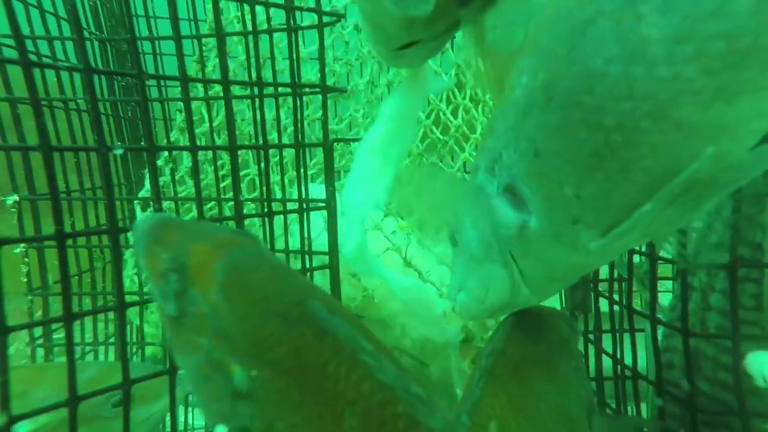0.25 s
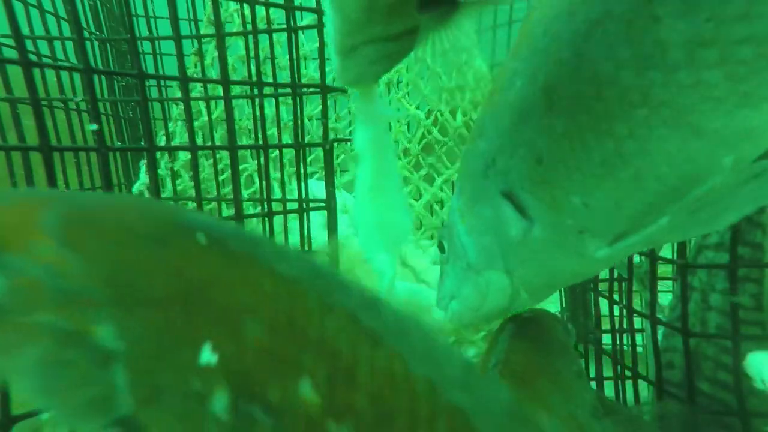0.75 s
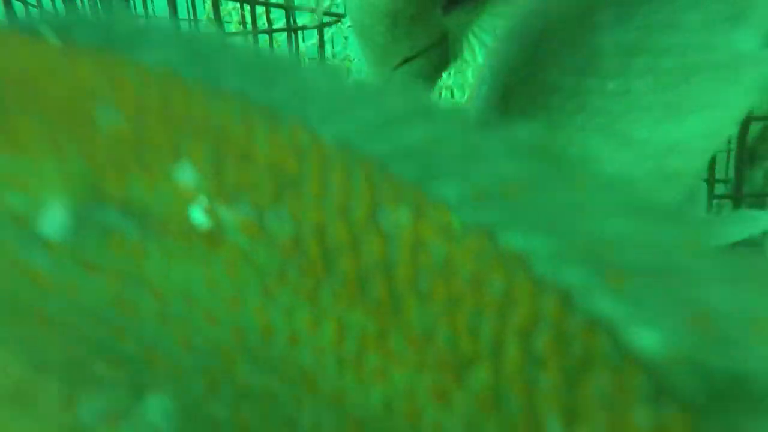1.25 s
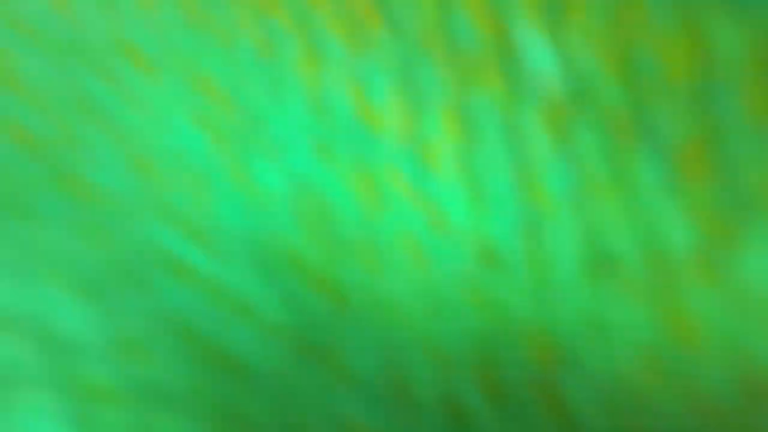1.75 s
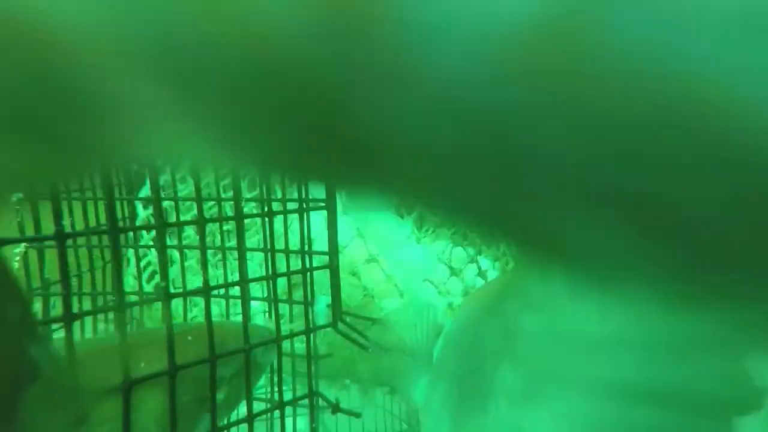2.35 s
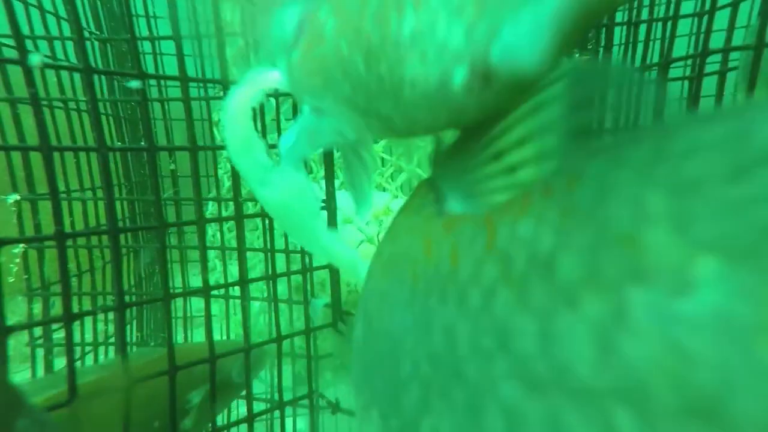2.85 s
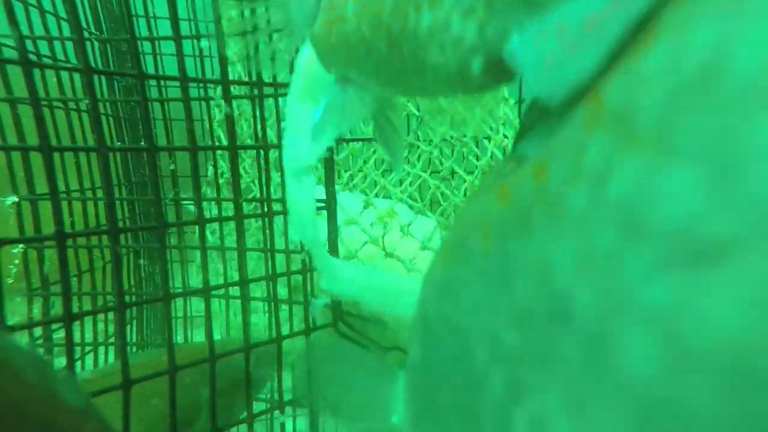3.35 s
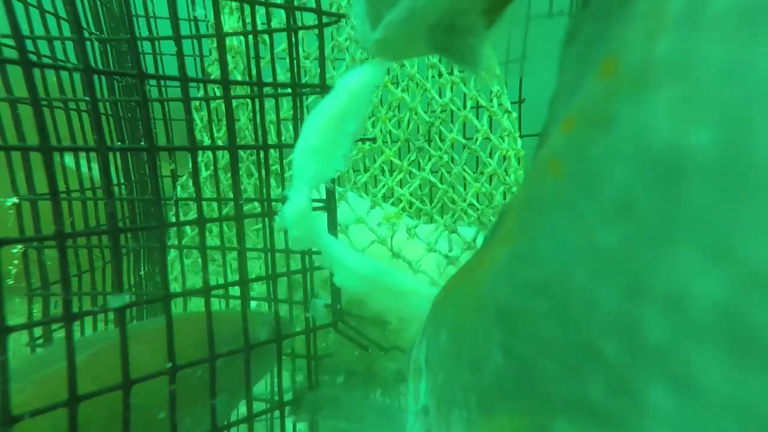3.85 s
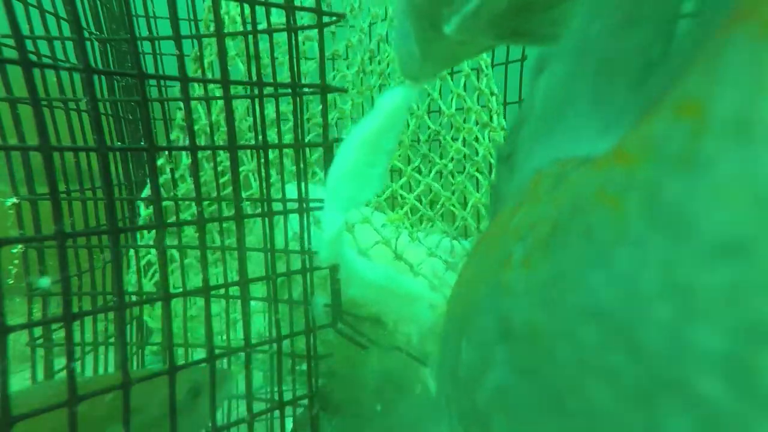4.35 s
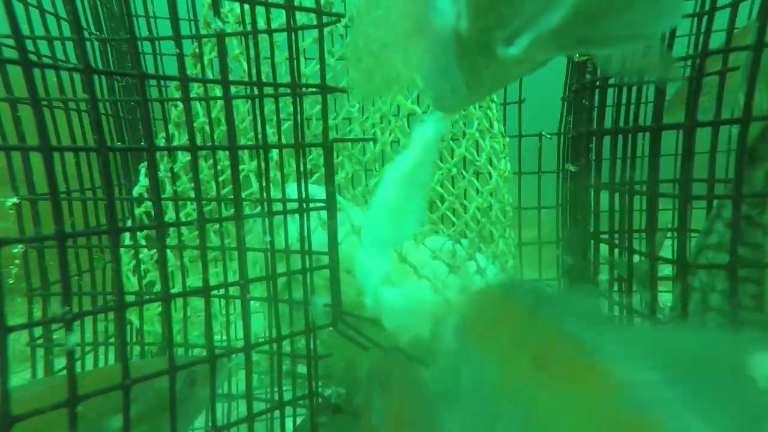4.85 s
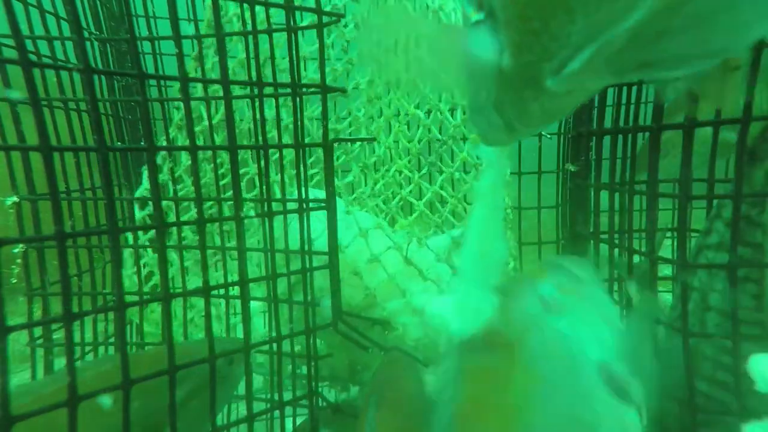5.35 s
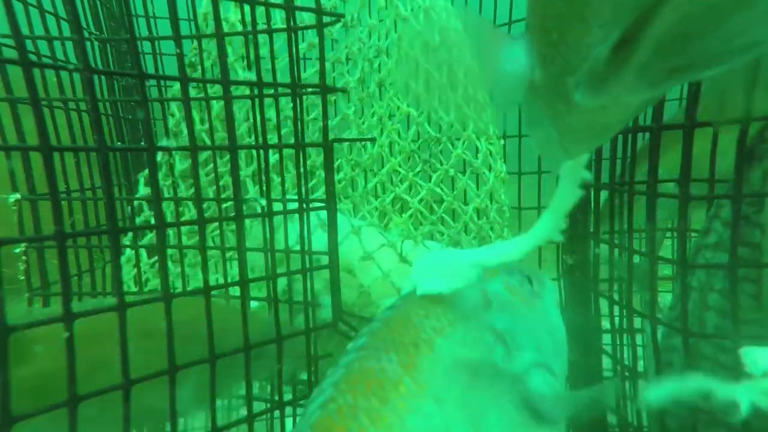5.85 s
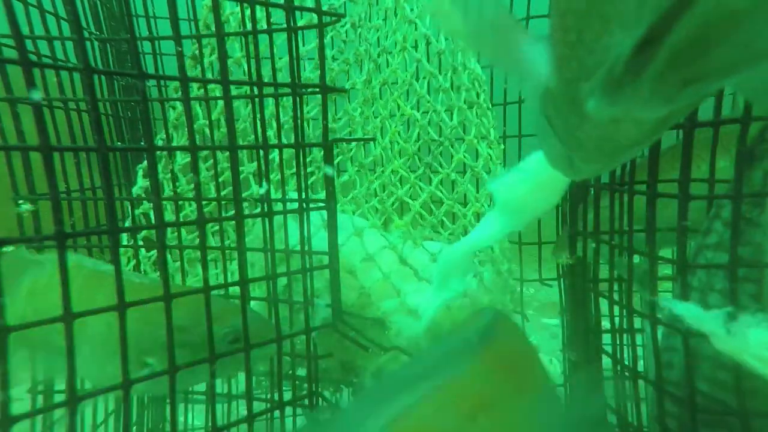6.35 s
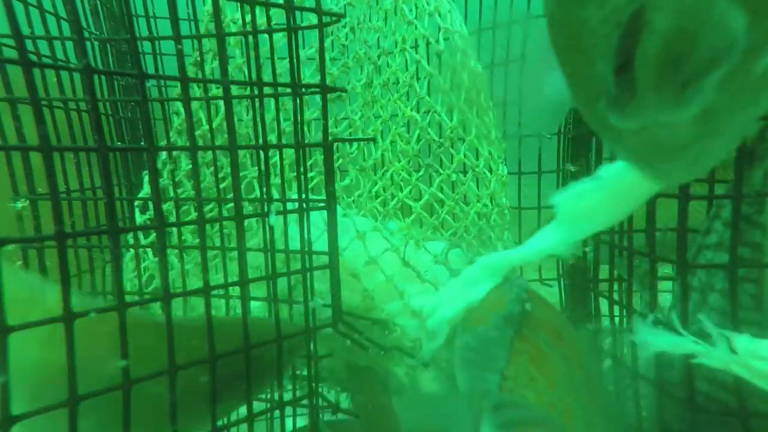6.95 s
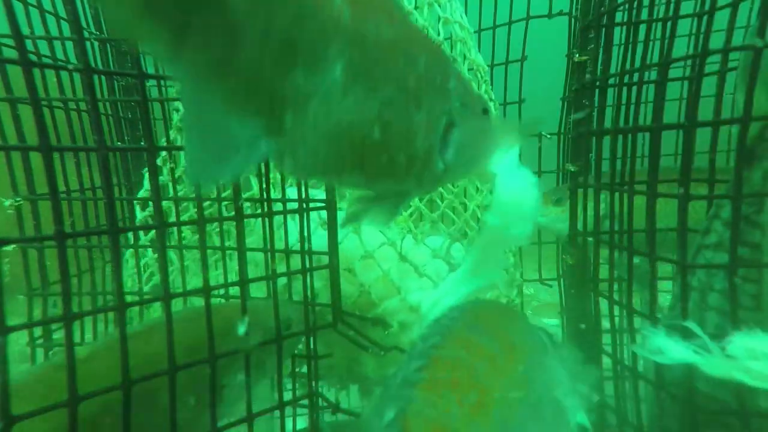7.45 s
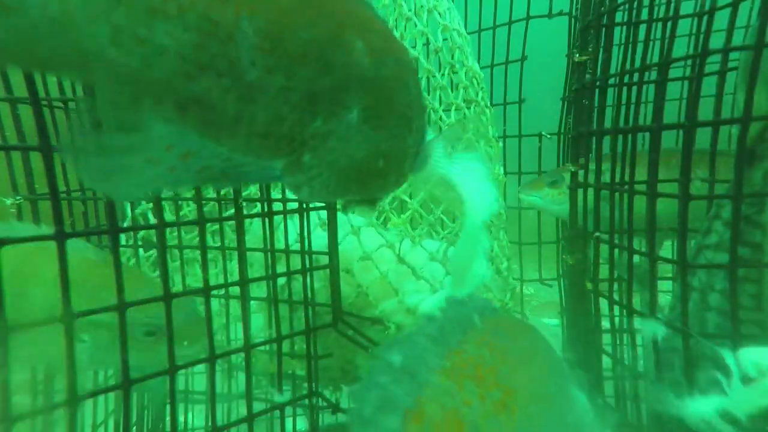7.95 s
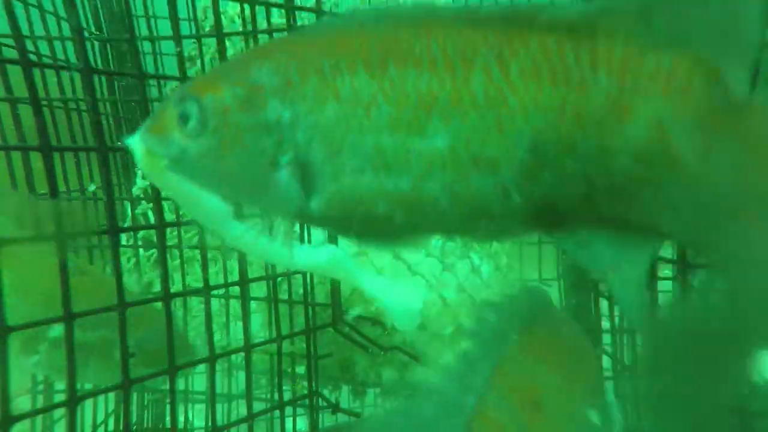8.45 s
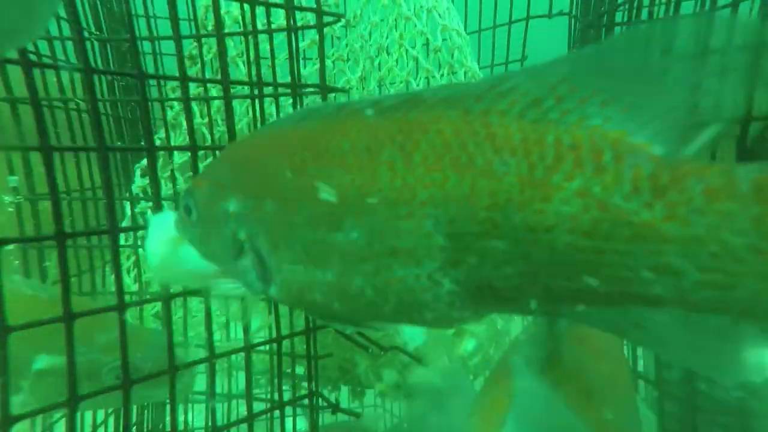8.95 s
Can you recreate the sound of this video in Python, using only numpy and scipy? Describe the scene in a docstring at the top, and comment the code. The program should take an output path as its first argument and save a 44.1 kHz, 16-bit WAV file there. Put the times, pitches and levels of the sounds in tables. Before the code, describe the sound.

Dull underwater thumps and hollow plastic knocks as fish bump a camera case inside a wire trap, over a steady low hiss.

```python
"""Fish bumping a bait trap

Fish tug at bait in a wire trap and bump a camera in a waterproof housing, heard from within it.
Soft blows excite low trap modes; scales and wire catch and slip on the hollow case, ringing its modes.
Plops and squeaks are swelling, wavering sines. Shaped noise gives the camera's hiss, a pulsed sine its whine.
"""
import sys
import numpy as np
from scipy import signal
from scipy.fft import rfft, irfft
from scipy.io import wavfile
from scipy.ndimage import uniform_filter1d

SR = 44100
rng = np.random.default_rng(int(sys.argv[2]) if len(sys.argv) > 2 else 0)


def master(y):
    """Save y as 16-bit WAV."""
    cut = np.clip(np.atleast_2d(y).T, -1, 1)
    pcm = np.round(cut * 32767)  # scale
    wavfile.write(sys.argv[1], SR, pcm.astype(np.int16))


N = 406587


def undb(db):
    """Decibels to amplitude gain."""
    return 10 ** (np.asarray(db) / 20)


def unit(x):
    """Scale to rms 1."""
    return x / np.sqrt(np.mean(x ** 2))


def add(out, x, start_s):
    """Mix x into out from start_s, cut at the end of out."""
    i = max(int(start_s * SR), 0)
    out[i:i + len(x)] += x[:max(N - i, 0)]


def noise(points, size, peaks=()):
    """Noise of rms 1 with a smooth spectrum, lifted at resonances."""
    freq_hz = np.maximum(np.fft.rfftfreq(size, 1 / SR), 1)
    point_hz, point_db = np.transpose(points)
    gain = undb(np.interp(np.log(freq_hz), np.log(point_hz), point_db))
    gain = gain * np.minimum(freq_hz / point_hz[0], 1) ** 2  # roll-off below the first point
    for centre_hz, width_hz, lift_db in peaks:
        offset = 2 * (freq_hz - centre_hz) / width_hz
        gain = gain * np.sqrt(1 + (undb(lift_db) ** 2 - 1) / (1 + offset ** 2))
    white = rng.standard_normal(size)
    return unit(irfft(gain * rfft(white), size))


def ring(modes, t, scatter_db, detune, signs=1):
    """Decaying modes; each place of contact weights and detunes them a little differently."""
    pitch_hz, t60_s, level_db = np.transpose(modes)
    chance = rng.standard_normal((len(pitch_hz), 2))
    gain = signs * undb(level_db + scatter_db * chance[:, 0])
    pitch_hz = pitch_hz * (1 + detune * chance[:, 1])
    decay = np.exp(-np.log(1000) * np.outer(1 / t60_s, t))
    return gain @ (np.sin(2 * np.pi * np.outer(pitch_hz, t)) * decay)


def voice(x, edges_hz, peaks_db, order, window):
    """Split a blow into bands and set each band's peak rms over a window of samples."""
    out = 0
    for low_hz, high_hz, peak_db in zip(edges_hz, edges_hz[1:], peaks_db):
        highpass = signal.butter(order, low_hz, "high", fs=SR, output="sos")
        lowpass = signal.butter(order, high_hz, fs=SR, output="sos")
        band = signal.sosfilt(np.vstack([highpass, lowpass] * 2), x)
        peak_rms = np.sqrt(uniform_filter1d(band ** 2, window).max())
        out = out + band * undb(peak_db) / peak_rms
    return out


def tilted(colour_db, edges_hz, pivot_hz, slope_db_per_octave):
    """Band levels of a blow: the harder it is, the more they lean to the treble about a pivot."""
    centres_hz = np.sqrt(np.multiply(edges_hz[:-1], edges_hz[1:]))
    return np.array(colour_db) + slope_db_per_octave * np.log2(centres_hz / pivot_hz)


# hiss spectrum inside the case: pitch_hz [Hz], density_db [relative dB per Hz]
HISS_SPECTRUM = [(20, 7), (33, 6), (58, -8), (85, -4), (150, -15.5), (250, -6), (340, -18.5), (480, -20),
                 (850, -22.5), (1200, -24), (1800, -21), (3900, -24.5), (8000, -35.5), (15000, -40.5)]
# air resonances colouring the hiss: centre_hz [Hz], width_hz [Hz], lift_db [dB]
CAVITY_MODES = [(181.4, 16.5, 11.5), (370, 43, 10), (729, 45, 6), (837, 20, 10.5), (1815, 80, 6.5),
                (2038, 48, 12.5), (2530, 55, 5.5)]
HISS_RMS_DB = -54


def camera(whine_hz=8630, whine_db=-80.5, pulse_depth=1.0, frame_hz=30):
    """Hiss coloured by the air in the case, and an electronic whine that pulses once a frame."""
    t = np.arange(N) / SR
    pulse = 1 + pulse_depth * np.tanh(2 * np.sin(2 * np.pi * frame_hz * t))
    whine = np.sin(2 * np.pi * whine_hz * t) * pulse
    return undb(HISS_RMS_DB) * noise(HISS_SPECTRUM, N, CAVITY_MODES) + undb(whine_db) * whine


# modes of the trap and camera mount: pitch_hz [Hz], t60_s [s], level_db [dB]
TRAP_MODES = [(39.98, 0.72, -4.5), (54.9, 0.86, -1.5), (64, 0.18, -21), (76.2, 0.22, 2.5),
              (107.5, 0.4, -7.5), (114.3, 0.37, -6.5), (129.2, 0.216, -3.5), (149.4, 0.19, -9),
              (171, 0.11, -7), (195, 0.13, -13), (244.6, 0.097, -7.5), (305.7, 0.058, -2)]
# edges of the sway, boom and shudder bands: edge_hz [Hz]
THUMP_BAND_EDGES_HZ = [33, 68, 135, 360]


def thump(push_s, peaks_db, judder_db=-9, judder_t60_s=0.31, judder_cutoff_hz=190):
    """A soft body pushes the trap once; the loose frame judders dully from the push on and dies away."""
    t = np.arange(SR) / SR
    push = np.sin(np.pi * np.minimum(t / push_s, 1)) ** 2
    lowpass = signal.butter(3, judder_cutoff_hz, fs=SR, output="sos")
    judder = unit(signal.sosfilt(lowpass, rng.standard_normal(len(t))))
    judder_gain = undb(judder_db - 60 * t / judder_t60_s) * (1 - np.exp(-t / 0.0011))
    force = push + judder * judder_gain
    modes = ring(TRAP_MODES, t, scatter_db=4.0, detune=0.027)
    sound = signal.fftconvolve(force, modes)[:len(t)]
    return voice(sound, THUMP_BAND_EDGES_HZ, peaks_db, order=2, window=SR // 50)


# sway, boom and shudder levels of a blow of firmness 0: level_db [dB]
THUMP_BAND_DB = [1.5, -3, -3.5]
THUMP_PIVOT_HZ = 95
PUSH_S, PUSH_HALVING_DB = 0.0096, 10.5  # push at firmness 0; firmness in dB per octave that halves it
# soft blows on the trap: start_s [s], level_db [dB], firmness_db [dB per octave], mount_boom_db [dB]
BODY_BLOWS = [(0.136, -41.5, 1, -2), (0.214, -37.5, 6.5, 2), (.75, -44, 3.5, -8), (1.351, -50, 1.5, 11),
              (2.004, -34, 6.5, 8.5), (2.43, -35, -0.4, 5.5), (2.491, -17.5, -0.2, 2.5),
              (2.578, -17, 0, 10), (2.798, -27, 4, 13), (2.817, -16.5, -3.5, 0), (3.939, -41.5, 2, 1),
              (4.042, -22, -1, -4), (4.146, -32.5, -4.5, -15), (4.666, -45.5, -3.5, 0),
              (4.817, -27, -1.5, -1.5), (5.338, -41, 4.5, 9), (5.355, -22, -1, 8.5),
              (5.433, -39.5, -12.5, 8.5), (5.536, -39.5, 4.5, 4), (5.625, -26.5, 2, -6),
              (5.792, -26.5, 0, -8), (5.851, -26.5, -3.5, -4), (6.237, -44, -2, 5), (6.363, -42, 1, 7),
              (7.046, -28, -0.5, -3), (7.118, -19.5, 6.5, 5.5), (7.164, -32, 5.5, -3),
              (7.574, -18, 3.5, -6), (8.219, -43, 0, 6), (8.962, -64, 14.5, 5)]


def blows():
    """Bodies bump the trap; firmer is shorter and brighter, and near the camera its mount booms."""
    out = np.zeros(N)
    for start_s, level_db, firmness_db, mount_boom_db in BODY_BLOWS:
        colour_db = tilted(THUMP_BAND_DB, THUMP_BAND_EDGES_HZ, THUMP_PIVOT_HZ, firmness_db)
        sway_db, boom_db, shudder_db = level_db + colour_db
        push_s = PUSH_S * 2 ** (-firmness_db / PUSH_HALVING_DB)
        add(out, thump(push_s, [sway_db, boom_db + mount_boom_db, shudder_db]), start_s)
    return out


def chirp(pitch_hz, peak_db, swell_cycles, waver=0.053):
    """A few wavering cycles that swell and die: a plop when short, a squeak when long."""
    t = np.arange(SR // 10) / SR
    age = t * pitch_hz / swell_cycles
    swell = age ** 2 * np.exp(2 * (1 - age))  # peaks at 1
    drift = unit(uniform_filter1d(rng.standard_normal(len(t)), size=SR // 300))
    phase_cycles = np.cumsum(pitch_hz * (1 + waver * drift)) / SR
    return undb(peak_db) * swell * np.sin(2 * np.pi * phase_cycles)


# squeaks and plops: start_s [s], pitch_hz [Hz], peak_db [dB], swell_cycles [cycles]
SQUEAKS_AND_PLOPS = [(.211, 742, -26, 12.4), (0.209, 2088, -28, 23), (0.223, 315, -32.5, 4.7),
                     (0.296, 1440, -41, 11), (3.674, 565, -45.5, 0.68), (3.745, 700, -46.5, 1.3),
                     (3.795, 678, -45, 1.2), (4.724, 2970, -47.5, 12), (6.142, 8200, -51, 11),
                     (6.858, 780, -51, 10.4), (9.058, 630, -38, 1), (9.095, 1890, -45, 16)]


def chirps():
    """Each squeak or plop is one swelling, wavering tone."""
    out = np.zeros(N)
    for start_s, pitch_hz, peak_db, swell_cycles in SQUEAKS_AND_PLOPS:
        add(out, chirp(pitch_hz, peak_db, swell_cycles), start_s)
    return out


# modes of the hollow case: pitch_hz [Hz], t60_s [s], level_db [dB]
CASE_MODES = [(320, 0.15, 0.5), (363.8, 0.15, -5), (458.5, 0.2, -13), (621, 0.15, -8.5), (747, .07, -9.5),
              (860.4, 0.058, 4.5), (1000, 0.056, 5.5), (1095, 0.13, -2), (1434, 0.14, -11),
              (1539, 0.024, 4.5), (1666, 0.017, -4), (1924, 0.08, -25), (1920, 0.024, 0),
              (2020, 0.093, -17), (2363, 0.029, -32.5), (2820, 0.01387, 3.5), (3186, 0.038, -19),
              (3336, .04, -19.5), (3930, 0.028, -18), (4188, 0.02, -12), (4230, 0.025, -9),
              (4470, .04, -28), (4710, 0.024, -25.5), (5478, 0.012, -29), (6590, 0.013, -15)]
# dense wash of the case's weaker modes: pitch_hz [Hz], level_db [dB]
CASE_WASH = [(300, 0), (900, 15.5), (2200, -1.5), (3200, -6.5), (5500, -26.5), (7500, -25), (10000, -53),
             (15000, -58)]
# edges of the hollow, middle, sharp and crisp bands: edge_hz [Hz]
KNOCK_BAND_EDGES_HZ = [330, 1150, 2800, 6500, 12500]


def knock(contact_s, peaks_db, slips_per_s=2600, grain_db=2.0, wash_db=-3, wash_t60_s=0.016,
          tail_db=-22, tail_t60_s=0.16):
    """A rough contact catches and slips many times, and every slip rings the hollow case."""
    t = np.arange(SR // 4) / SR
    age = t / contact_s
    # the grip takes hold quickly and lets go more slowly
    pressure = (1 - np.exp(-age / .15)) ** 2 / (1 + age ** 5)
    slips = rng.random(len(t)) < slips_per_s / SR
    strength = undb(grain_db * rng.standard_normal(len(t)))
    force = pressure * slips * strength * rng.choice([-1, 1], len(t))
    signs = (-1) ** (np.arange(len(CASE_MODES)) // 2)
    modes = ring(CASE_MODES, t, scatter_db=1.0, detune=0.0076, signs=signs)
    # a fainter, longer diffuse tail follows the short wash
    decay = undb(-60 * t / wash_t60_s) + undb(tail_db - 60 * t / tail_t60_s)
    wash = noise(CASE_WASH, len(t)) * decay
    response = unit(modes) + undb(wash_db) * unit(wash)
    sound = signal.fftconvolve(force, response)[:len(t)]
    return voice(sound, KNOCK_BAND_EDGES_HZ, peaks_db, order=4, window=SR // 200)


# hollow, middle, sharp and crisp levels of a contact of hardness 0: level_db [dB]
KNOCK_BAND_DB = [-1, 0.5, -10, -29.5]
KNOCK_PIVOT_HZ = 1800
# hard contacts, taps when short, scrapes when long:
# start_s [s], contact_s [s], level_db [dB], hardness_db [dB per octave]
CASE_CONTACTS = [(.212, 0.019, -32.5, 0), (0.344, 0.013, -48, -2), (0.778, 0.02, -50, -0.5),
                 (1.084, 0.0095, -50.5, 2.5), (2.019, 0.022, -36, -3), (2.149, 0.019, -50.5, 2.5),
                 (2.194, 0.012, -55, 4), (2.362, 0.012, -57.5, 6.5), (2.442, 0.051, -45.5, 0),
                 (2.497, 0.021, -30.5, 0), (2.52, 0.02, -35.5, -1.5), (2.558, 0.0095, -38, 1.5),
                 (2.579, 0.032, -34, -1.5), (2.632, 0.022, -38.5, 1.5), (2.65, 0.035, -38, 0.5),
                 (2.749, .012, -47.5, 3), (2.786, 0.015, -33.5, 2.5), (2.808, 0.015, -25.5, -1.5),
                 (2.823, 0.0088, -12.5, 0), (2.91, 0.013, -35, 1.5), (3.46, 0.0038, -61, 11.5),
                 (3.61, 0.004, -58.5, 13.5), (4.038, .021, -36, -3), (4.067, 0.0068, -37.5, -1.5),
                 (4.087, .026, -41.5, -5), (4.725, 0.0042, -56.5, 0), (4.827, 0.0084, -41, 2),
                 (5.079, .005, -55, -4), (5.289, 0.028, -62.5, 13), (5.344, 0.028, -41.5, -0.5),
                 (5.368, 0.02, -41, -0.5), (5.541, 0.038, -44, -2), (5.622, 0.034, -48.5, -6),
                 (5.788, 0.015, -33, 2.5), (5.82, .016, -29, 1.5), (6.244, 0.0097, -42.5, 2.5),
                 (7.046, 0.035, -43, -6.5), (7.088, 0.019, -42.5, -2.5), (7.116, .016, -21, -1.5),
                 (7.155, 0.038, -49, -7.5), (7.553, 0.013, -44, -3), (7.571, 0.02, -30, -2),
                 (8.1, 0.016, -56, -2), (8.261, 0.014, -52, -0.5), (8.888, 0.0045, -56, -1),
                 (8.937, 0.013, -61, 9), (8.972, 0.0033, -55.5, -2.5), (9.056, 0.0015, -53, 4),
                 (9.1, .016, -60, 8.5)]


def contacts():
    """Scales and wire meet the case; harder contacts sound brighter."""
    out = np.zeros(N)
    for start_s, contact_s, level_db, hardness_db in CASE_CONTACTS:
        colour_db = tilted(KNOCK_BAND_DB, KNOCK_BAND_EDGES_HZ, KNOCK_PIVOT_HZ, hardness_db)
        add(out, knock(contact_s, level_db + colour_db), start_s)
    return out


def nibbles(count=30, level_db=-68, sharp_db=-6, contact_s=0.0093, crisp_db=-12):
    """Faint random ticks of mouths and fins on the bait and mesh."""
    out = np.zeros(N)
    peaks_db = level_db + np.array([0.6 * sharp_db, 0, sharp_db, crisp_db])
    for place in rng.random(count):
        add(out, knock(contact_s, peaks_db), place * N / SR)
    return out


def scene():
    """All sounds sum at the one microphone in the case."""
    return (camera() + blows() + chirps() + contacts() + nibbles())[None]


TOP_HZ = 15300


def record(dry):
    """The camera clips peaks at full scale, then cuts the top with a steep low-pass."""
    clipped = np.clip(dry, -1, 1)
    lowpass = signal.ellip(10, .1, 80, TOP_HZ, fs=SR, output="sos")  # 0.1 dB ripple, 80 dB stopband
    return signal.sosfilt(lowpass, clipped)


dry = scene()
out = record(dry)
master(out)
```